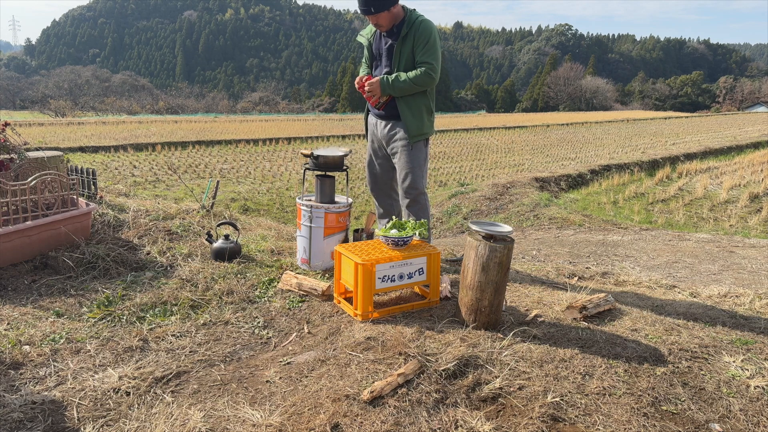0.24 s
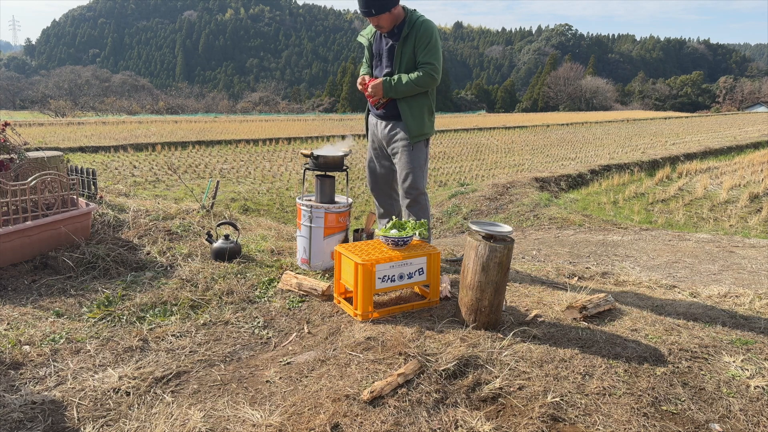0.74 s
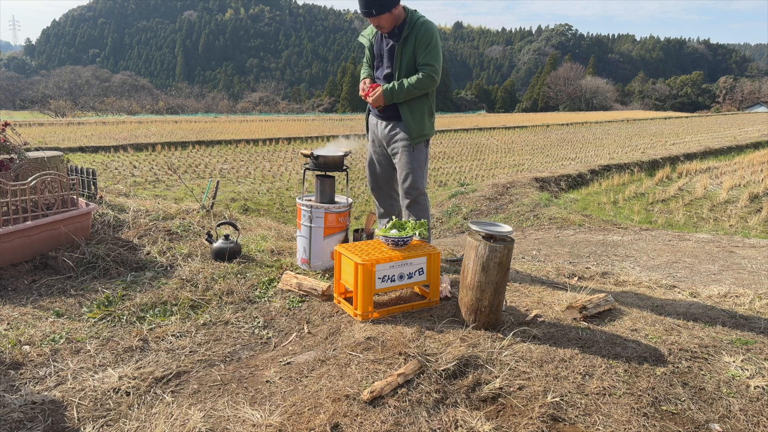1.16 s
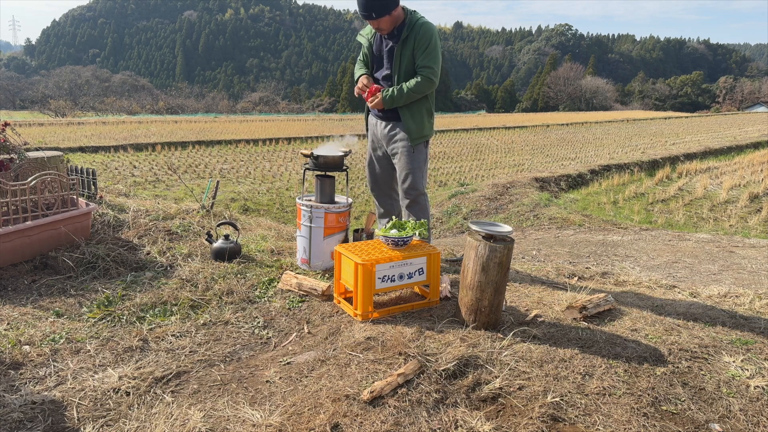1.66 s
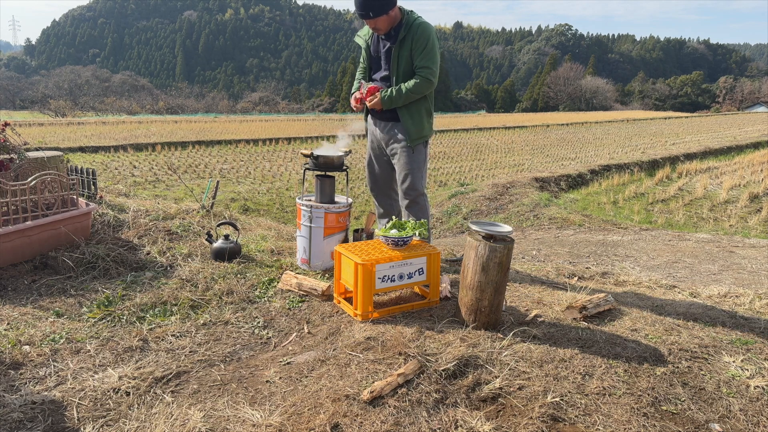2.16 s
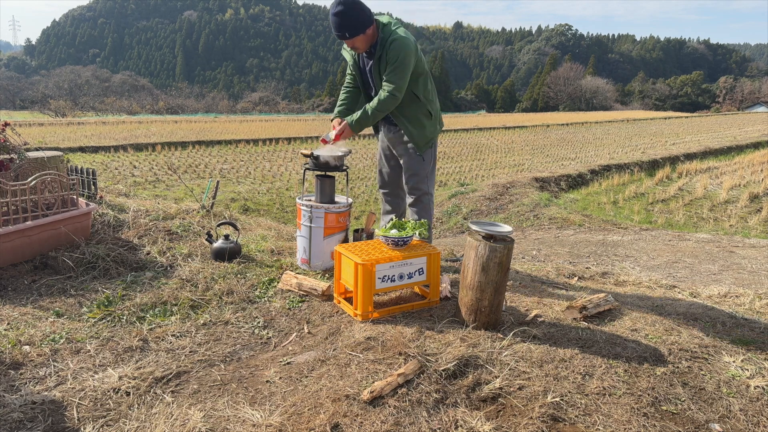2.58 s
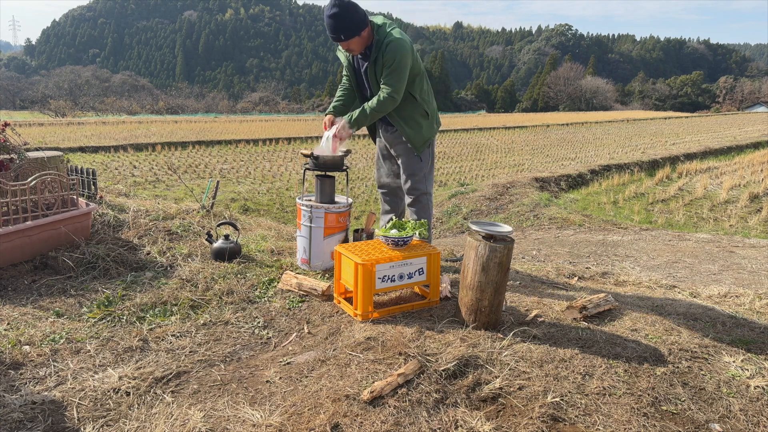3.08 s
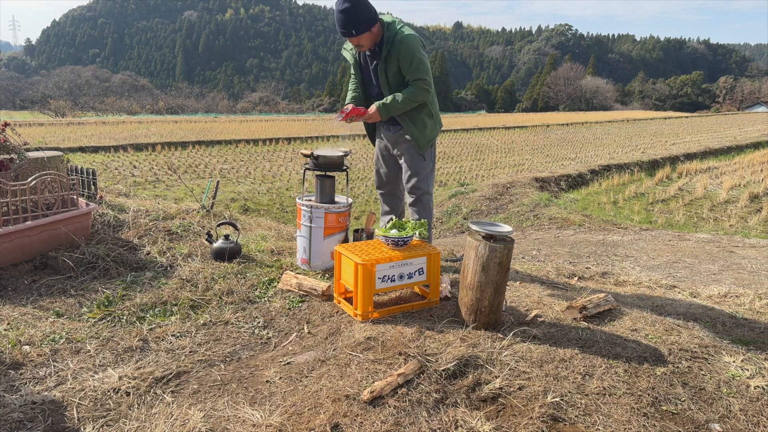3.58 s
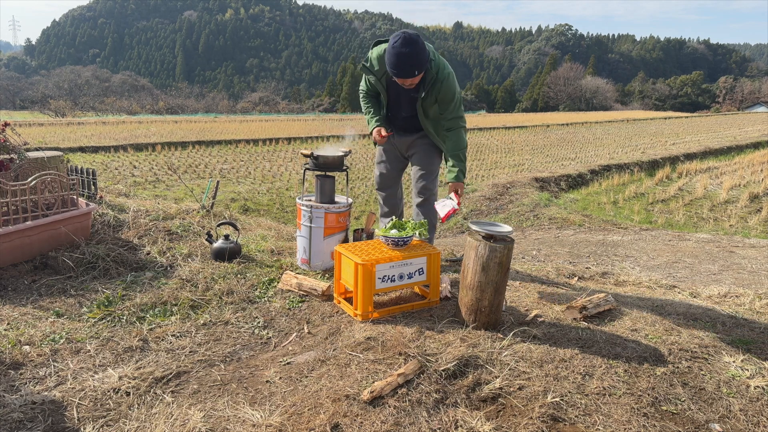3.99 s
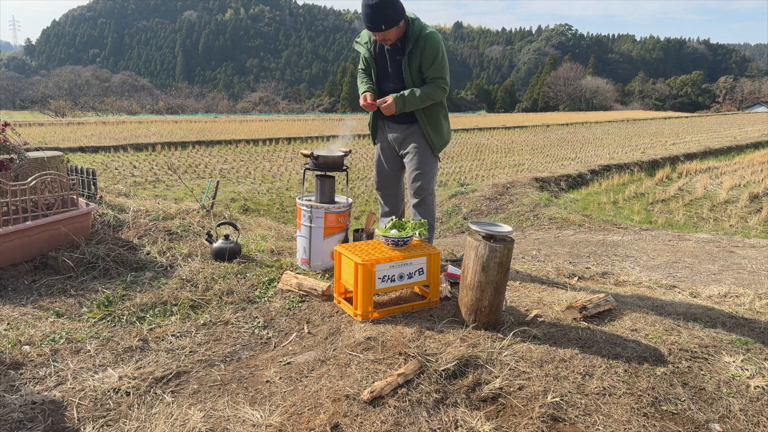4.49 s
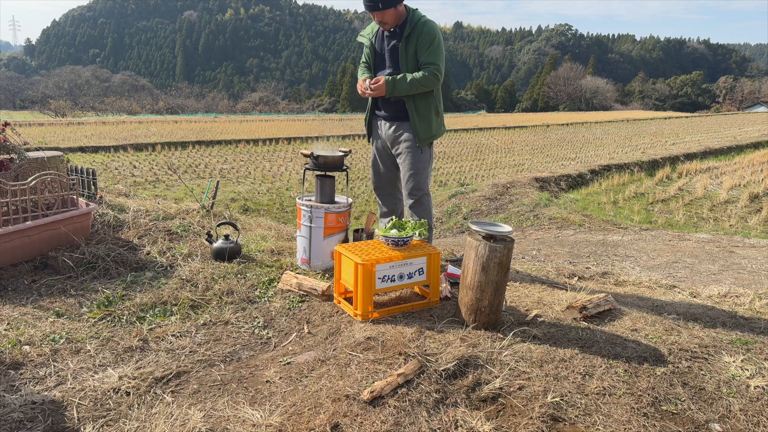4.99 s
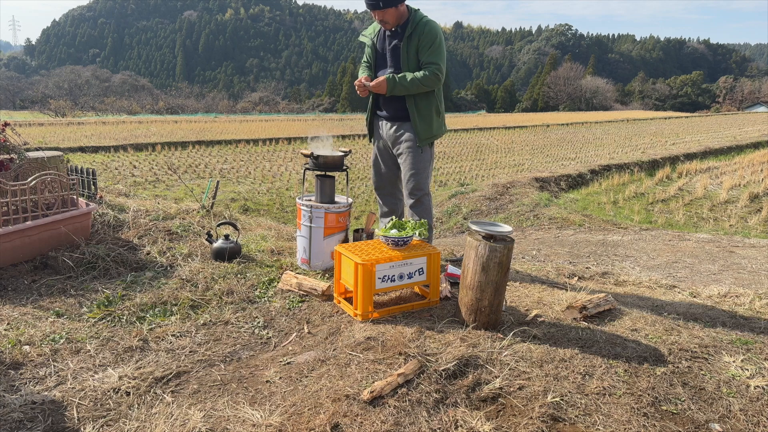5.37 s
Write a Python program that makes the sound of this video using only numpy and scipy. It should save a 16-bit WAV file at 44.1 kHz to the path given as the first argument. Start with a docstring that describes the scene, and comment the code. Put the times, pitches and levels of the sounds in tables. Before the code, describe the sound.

A stiff plastic food packet crackles loudly close up, is torn open and emptied, then folded with lighter crinkles, over a faint outdoor murmur.

```python
"""A plastic noodle packet, close to the microphone in a field, is torn open, emptied over a pot and folded up.
Every crease that buckles gives a bright tick of the film and a duller knock of the hollow pouch.
Big snaps stand out of a dense crinkle made of countless small buckles; the parting film squeals, a gliding
resonance driven by tiny jerks, and the noodle block thuds in the pouch. Under it a pot simmers in soft low blips,
the stove and open air murmur as coloured noise, and a breeze brushes the microphone as noise of the lowest bass."""
import sys
import numpy as np
from scipy import signal
from scipy.fft import rfft, irfft, next_fast_len
from scipy.io import wavfile
from scipy.ndimage import uniform_filter1d

SR = 44100
rng = np.random.default_rng(int(sys.argv[2]) if len(sys.argv) > 2 else 0)


def materialize(psi):
    """Save the field psi as 16-bit PCM at rate SR to the path in sys.argv[1].

    A 1-D psi becomes a single channel; in a 2-D psi each row is a channel.
    """
    bounded = np.clip(np.atleast_2d(psi).T, -1, 1)
    quanta = np.round(bounded * 32767).astype(np.int16)
    wavfile.write(sys.argv[1], SR, quanta)


N = 248724  # samples, 5.64 s

# The packet rings higher when taut and lower when slack: t/s, film f/Hz, pouch f/Hz
TAUTNESS_CURVE = [(0, 8800, 1480), (.5, 9030, 1480), (.8, 8400, 1490), (1.2, 9700, 1370), (1.8, 8350, 1260),
                  (2.1, 7200, 1490), (2.45, 8400, 1034), (2.95, 8200, 1110), (3.35, 7550, 620),
                  (3.6, 7630, 1150), (3.9, 7600, 600), (4.4, 8000, 1280), (4.9, 9760, 1570),
                  (5.6, 8900, 1170)]


def packet():
    """Snaps and crinkle, radiated by the film and by the pouch, each with its own colour and its own echo."""
    # how the film radiates: f/Hz, level/dB
    film_colour = [(300, -2.5), (1800, 9.5), (2800, -0.5), (4000, -2.5), (5500, -2), (7000, -2), (8500, 0),
                   (10300, 2), (11500, -0.5), (13000, -33.5)]
    # how the hollow pouch radiates: f/Hz, level/dB
    pouch_colour = [(40, 2.5), (130, -7), (220, -1), (320, -1), (500, -1.5), (800, -2), (1200, -1),
                    (1650, -1.5), (2150, -5), (2800, -1), (3700, -1), (5500, 5.5), (12000, -32)]
    snap_film, snap_pouch = snaps()
    fine_film, fine_pouch = crinkle(per_s=430, size_db=1.5, own_db=3.0, even_s=0.017, count=4500)
    film = coloured(snap_film + fine_film, film_colour)
    pouch = coloured(snap_pouch + fine_pouch, pouch_colour)
    film = outdoors(film, ground_db=-25.5, far_db=-30, far_t60=0.065)
    pouch = outdoors(pouch, ground_db=-37, far_db=-14, far_t60=0.039)
    return film + pouch


def snaps():
    """Big buckles: the film ticks, the pouch knocks and rings longer, with a crack that grows with the knock."""
    # snaps that stand out of the crinkle, levels ahead of the packet's colour:
    # t/s, film level/dB over 1 ms, pouch level/dB over 1 ms, pouch f/Hz, share of the energy in the noise burst/0-1
    snap_table = [(.0125, -24, -52, 1480, 0.26), (.0608, -33, -31.5, 2370, .07),
                  (.1497, -29.5, -29.5, 1520, 0.7), (.161, -34, -28.5, 2080, 0),
                  (.1712, -21, -31.5, 1220, 0), (.21, -30.5, -43, 2150, 0), (.2948, -32, -32.5, 1470, .4),
                  (.3088, -21, -36, 1380, 0.7), (.3486, -15, -25, 1510, 0), (.371, -23, -44, 1590, 0),
                  (.3884, -40, -24, 1040, 0.05), (.4435, -14, -25, 1860, 0.44), (.4578, -20, -45, 2260, 1),
                  (.529, -22.5, -28.5, 1350, 0.6), (.5362, -38, -22, 1500, 0.4),
                  (.5466, -19.5, -20, 1060, 0.73), (.5626, -16, -25.5, 1280, .4),
                  (.5995, -16.5, -31, 1920, 0.5), (.6263, -29, -31.5, 1600, 0.4),
                  (.637, -19.5, -25, 1520, 0.46), (.6963, -29, -31, 1590, 0),
                  (.7726, -29, -28.5, 1950, 0.6), (.8149, -7.5, -13.5, 1640, 0.08),
                  (.833, -19.5, -17, 1240, 0.4), (.8412, -20, -23.5, 1530, 0.22),
                  (.8474, -24, -29, 2350, 1), (.951, -32, -29, 1300, 0.7), (.9922, -28.5, -39, 1920, 0.2),
                  (1.0213, -28, -52, 1500, 0.4), (1.053, -30, -32, 1020, 0.1), (1.145, -36, -29, 1290, 0.2),
                  (1.1675, -21, -26.5, 1490, 0), (1.2052, -30, -23, 1950, 0.08),
                  (1.2172, -8, -16, 1570, 0.3), (1.2229, -19, -23, 1310, 1),
                  (1.3097, -17.5, -25.5, 2040, 0.4), (1.4484, -26.5, -19.5, 2100, 0.3),
                  (1.4927, -26, -28.5, 2160, 0.2), (1.753, -23, -33, 1490, 0.7),
                  (1.8187, -25.5, -26.5, 950, .4), (1.8411, -20.5, -23, 1420, 0.72),
                  (1.9669, -28, -26.5, 1590, 0), (2.0372, -23.5, -51, 1900, 0.5),
                  (2.074, -26.5, -33, 1930, 0.7), (2.2437, -35, -57, 1550, 0),
                  (2.3688, -37, -51, 1280, 0.3), (2.4484, -30, -31.5, 1080, 0.5),
                  (2.5553, -27.5, -55, 1160, 0.7), (2.6787, -28.5, -45, 1370, 0.8),
                  (2.777, -29, -50, 1310, 0.1), (2.7903, -25, -52, 1460, 1), (2.8876, -25, -55, 1410, 0.1),
                  (2.8971, -28, -50, 1025, 0.3), (2.9222, -35, -34.5, 1430, 0.1),
                  (2.9399, -28, -34, 1230, 0.7), (3.0007, -28.5, -55, 1870, .6),
                  (3.1432, -37, -47, 1030, .2), (3.2542, -38.5, -45, 1090, 1), (3.272, -39, -51, 990, 0.5),
                  (3.3327, -40, -40, 1010, 0.7), (3.3897, -40.5, -42.5, 1690, 0.06),
                  (3.4118, -38.5, -47, 1120, 0), (3.4937, -35, -40.5, 1670, .15),
                  (3.5239, -29, -35.5, 1650, 0.7), (3.5494, -37, -37.5, 1200, 0.1),
                  (3.6058, -30, -37.5, 1900, 0), (3.6414, -36, -35.5, 1080, .9),
                  (3.6673, -27.5, -33.5, 1260, 0.07), (3.7058, -33.5, -41.5, 1410, .4),
                  (3.839, -54, -46, 1210, 0), (3.872, -41.5, -54, 1400, 0), (3.9209, -33, -46, 840, .8),
                  (4.1294, -37, -61, 920, 0.14), (4.2514, -35, -54, 860, 1),
                  (4.2859, -24.5, -63, 1760, 0.3), (4.4106, -21, -46, 1590, 0.76),
                  (4.4498, -26.5, -43.5, 2220, .3), (4.4995, -29, -48, 1430, 0),
                  (4.5157, -28, -57, 1430, 0.2), (4.719, -34, -38.5, 1440, 1),
                  (4.8189, -26.5, -50, 1750, 0), (4.8464, -26, -34, 1650, .95),
                  (4.9016, -21, -35.5, 2090, 0.74), (4.987, -20, -35, 2320, 0.7),
                  (5.0447, -25, -47, 1480, 0.55), (5.0824, -26.5, -41, 1830, 0.94),
                  (5.1119, -21, -64, 1570, 0.08), (5.1787, -24, -59, 1800, 0.14),
                  (5.1861, -21, -39.5, 1400, 0.65), (5.33, -30, -46, 1560, 0.2),
                  (5.36, -26.5, -37.5, 2020, 0.4), (5.4426, -32, -45, 1740, 1),
                  (5.47, -33.5, -40, 1710, 0.16), (5.5158, -37.5, -49, 1400, 0.5),
                  (5.5603, -18.5, -41, 2400, 0.02)]
    s, film_db, pouch_db, pouch_hz, share = np.transpose(snap_table)
    # the snaps scatter about the film pitch; the spread is a frequency ratio in dB
    film_hz = in_time(TAUTNESS_CURVE)[0][(s * SR).astype(int)]
    film_hz = film_hz * from_db(rng.normal(0, 0.76, len(s)))
    one_ms = np.sqrt(SR / 1000)  # spreads the level over 1 ms
    tick = facets(film_hz, below=0.42, above=0.43, q=4.94, count=4, size=128)
    knock = facets(pouch_hz, below=1.305, above=0.74, q=4.25, count=4, size=800)
    crack = facets(pouch_hz * 2.2, below=1.0, above=1.0, q=2.12, count=2, size=256)  # an overtone of the pouch
    crack_db = 1.35 * pouch_db + 2.5  # the crack grows faster than the knock
    blurred = np.clip(share, 0, 1) ** 0.51  # the pouch has more of its energy in the burst
    film = buckles(s, one_ms * from_db(film_db), tick, 0.053 + share, rise_s=0.0042, fall_s=0.0043)
    pouch = buckles(s, one_ms * from_db(pouch_db), knock, blurred, rise_s=0.0024, fall_s=0.0032)
    pouch += buckles(s, one_ms * from_db(crack_db), crack, blurred, rise_s=0.00045, fall_s=0.0048)
    return film, pouch


def crinkle(per_s, size_db, own_db, even_s, count):
    """Countless small buckles of very unequal size; they come faster the harder the packet is worked."""
    film_db, pouch_db = handling()
    film_hz, pouch_hz = in_time(TAUTNESS_CURVE)
    at = rng.integers(0, N, count)
    rate = per_s * from_db(.3 * (film_db[at] + 41.0))  # per_s holds where the film is worked at -41 dB
    born = rng.random(count) < rate * N / SR / count
    size = size_db * np.minimum(rng.exponential(1, count), 4)
    own = own_db * rng.standard_normal((2, count))  # film and pouch differ
    film_size, pouch_size = born * from_db(size + own)
    share = rng.random(count) ** 0.38
    # every crease has a pitch of its own
    film_hz = film_hz[at] * from_db(rng.normal(0, 0.63, count))
    pouch_hz = pouch_hz[at] * from_db(rng.normal(0, 2.4, count))
    ticks = facets(film_hz, below=0.51, above=0.58, q=3.95, count=3, size=128)
    knocks = facets(pouch_hz, below=1.77, above=0.94, q=4.25, count=4, size=512)
    film = buckles(at / SR, film_size, ticks, share, rise_s=0.0013, fall_s=0.0048)
    pouch = buckles(at / SR, pouch_size, knocks, share, rise_s=0.0013, fall_s=0.0037)
    return from_db(film_db) * evened(film, even_s), from_db(pouch_db) * evened(pouch, even_s)


def handling():
    """How loudly the film and the pouch crinkle under the fingers, in dB ahead of the packet's colour."""
    # each squeeze or pull sets off a run of fine crinkle: first working at the seam and pulling it open,
    # from 2.2 s peeling it back and sliding the noodles out, from 3.8 s putting it down, then folding:
    # start t/s, length/s, swell from start to end/dB, film level/dB, pouch level/dB
    squeezes = [ (0, 0.1, -4.5, -39.5, -45), (0.138, 0.11, -6, -42.5, -51), (0.277, 0.16, -6, -35.5, -44),
                (0.441, 0.032, -1, -29, -35), (0.498, 0.11, 4.5, -35, -43.5), (0.605, 0.1, 5, -43.5, -43.5),
                (0.751, 0.039, 8, -39.5, -41), (0.813, 0.039, -3, -36, -39), (0.847, 0.049, 1, -43.5, -47),
                (0.933, 0.084, -7, -48, -46), (1.029, 0.095, 7, -50, -49.5),
                (1.118, 0.15, -1, -36.5, -41.5), (1.275, 0.079, 0.5, -35.5, -38.5),
                (1.367, 0.11, -0.5, -38.5, -41), (1.56, 0.078, 8, -45.5, -45),
                (1.634, 0.16, -5.5, -39, -41), (1.813, 0.037, 0, -36, -36.5),
                (1.901, 0.12, 4, -43.5, -48.5), (2.021, 0.12, 0.5, -42, -63), (2.227, 0.069, 6, -45, -43.5),
                (2.324, 0.11, 8, -52.5, -50.5), (2.428, 0.094, 9, -40, -44.5),
                (2.537, 0.16, -8.5, -44, -51.5), (2.712, .05, 8, -42.5, -49.5),
                (2.765, 0.19, -15, -39.5, -47.5), (2.973, 0.11, -8, -43.5, -50),
                (3.096, 0.069, -5.5, -59.5, -60), (3.25, 0.14, -3, -67.5, -67),
                (3.506, 0.087, 8.5, -55.5, -52.5), (3.65, 0.074, 3, -59, -59),
                (3.776, 0.11, -8.5, -53.5, -63), (4.012, .05, -4, -56, -67), (4.12, 0.17, -7, -54, -63),
                (4.275, 0.062, 6.5, -43.5, -58), (4.362, 0.3, -5.5, -48, -62.5),
                (4.575, 0.043, 10, -39, -53.5), (4.64, 0.061, 1, -45, -58), (4.686, 0.12, -0.5, -39.5, -53),
                (4.826, 0.19, -1, -39, -61), (5.036, 0.068, -7, -47.5, -61), (5.125, .11, 9.5, -48.5, -60),
                (5.276, 0.068, 2, -57.5, -60), (5.327, 0.037, 5.5, -49, -67), (5.44, 0.051, 0, -57.5, -69),
                (5.497, .075, 3, -60, -69), (5.627, .02, 3, -51.5, -58)]
    start, length, swell_db, film_db, pouch_db = np.transpose(squeezes)
    return strokes(start, length, swell_db, film_db), strokes(start, length, swell_db, pouch_db)


def strokes(start, length, swell_db, level_db):
    """Level in dB of hand movements: each takes hold quickly, swells or sags, is let go and leaves a faint tail."""
    grip_s, let_go_db_per_s = .009, 439.5
    relax_db, relax_db_per_s = -19, 33  # the creases go on relaxing, this much softer, and slowly come to rest
    t = np.arange(0, N, 32) / SR
    age = t - start[:, None]
    length = np.maximum(length, .005)[:, None]
    since = np.maximum(age - length, 0)
    held_db = level_db[:, None] + swell_db[:, None] * (np.clip(age / length, 0, 1) - .5)
    fade_db = np.maximum(-let_go_db_per_s * since, relax_db - relax_db_per_s * since)
    gain = np.clip(age / grip_s, 0, 1) * from_db(held_db + fade_db)
    loudest = np.max(gain ** 2, axis=0)
    return np.interp(np.arange(N) / SR, t, 10 * np.log10(loudest + 1e-12))


def buckles(s, gains, rings, share, rise_s, fall_s):
    """Each buckle is one sharp jump in a short two-sided burst of noise; both excite its ring."""
    lead = SR // 200  # 5 ms of burst ahead of the jump
    t = np.arange(-lead, 2 * lead) / SR
    envelope = np.exp(np.where(t < 0, t / rise_s, -t / fall_s)).astype(np.float32)
    drive = rng.standard_normal((len(s), len(t)), np.float32) * envelope
    share = np.clip(share, .02, .98)  # of the energy, in the burst
    drive *= (np.sqrt(share) / np.linalg.norm(drive, axis=1))[:, None]
    drive[:, lead] += np.sqrt(1 - share)  # the sharp jump
    sounds = signal.fftconvolve(drive, rings, axes=1)
    sounds = sounds * (gains / np.linalg.norm(sounds, axis=1))[:, None]
    at = (s * SR).astype(int)[:, None] + np.arange(sounds.shape[1])
    return np.bincount(np.maximum(at, 0).ravel(), sounds.ravel(), N + lead)[lead:N + lead]


def facets(hz, below, above, q, count, size):
    """One short ring per pitch, of energy 1: a few modes, from some octaves below it to some above, swell and die."""
    place = rng.random((len(hz), count))
    strength = rng.random((len(hz), count)) - .5
    octaves = (below + above) * (np.arange(count) + place) / count - below
    modes = hz[:, None] * 2 ** octaves
    # either sign, never silent, stronger towards the high modes
    strength = np.sign(strength) * (0.11 + np.abs(strength)) * modes / hz[:, None]
    rings = np.zeros((len(hz), size), np.float32)
    for k in range(count):
        step = (2 * np.pi * modes[:, k, None] / SR).astype(np.float32)
        turn = step * np.arange(size, dtype=np.float32)
        swell_and_die = turn * np.exp(-turn / np.float32(q))
        rings += strength[:, k, None].astype(np.float32) * np.sin(turn) * swell_and_die
    return rings / np.sqrt(np.sum(rings ** 2, axis=1, keepdims=True))


def outdoors(x, ground_db, far_db, far_t60):
    """A weak bounce off the ground and a faint scatter from the things standing around."""
    t = np.arange(SR // 3) / SR
    scatter = rng.standard_normal(len(t)) * from_db(-60 * t / far_t60) * (t > .008)
    response = from_db(far_db) * scatter / np.linalg.norm(scatter)
    response[int(.0078 * SR)] += from_db(ground_db)  # the bounce comes 7.8 ms late
    return x + signal.fftconvolve(x, response)[:N]


def tearing():
    """The stretched film squeals as it parts, and a strip runs off the top."""
    # the strip rises as it shortens: t/s, f/Hz, level/dB
    rip = [(2.02, 1250, -92), (2.06, 1520, -44), (2.12, 1660, -53), (2.145, 1960, -49), (2.175, 2560, -55),
           (2.19, 2700, -100)]
    # the squeal of the stretched film: t/s, f/Hz, level/dB
    squeal = [(.445, 10000, -80), (.456, 10200, -17.5), (.465, 10100, -27), (.475, 9800, -23),
              (.487, 8700, -35), (.493, 7400, -38), (.497, 8350, -31), (.502, 8400, -22.5),
              (.51, 8300, -75)]
    return tear(rip, width_hz=260, per_s=280) + tear(squeal, width_hz=580, per_s=4500)


def tear(curve, width_hz, per_s):
    """A tear advances in tiny jerks that excite a gliding resonance of the film."""
    hz, level_db = in_time(curve)
    turn = np.exp(2j * np.pi * np.cumsum(hz) / SR)
    jerks = (rng.random(N) < per_s / SR) * rng.standard_normal(N) + 1e-9
    # resonate at 0 Hz, then shift up to the gliding pitch
    ring = turn * signal.lfilter([1], [1, -np.exp(-np.pi * width_hz / SR)], jerks / turn)
    return from_db(level_db) * evened(ring.real, 0.0066)


def block(q, count):
    """The noodle block catches and slips against the pouch: many soft, low thuds."""
    # the dry block slides inside the pouch: start t/s, length/s, swell/dB, level/dB, f/Hz
    slides = [(.25, 0.5, -7, -62, 333), (1.193, 0.05, 0, -59, 380), (1.638, 0.13, -1, -50.5, 405),
              (1.97, 0.035, -4, -46.5, 296), (2.247, 0.28, 0, -56.5, 530), (2.77, 0.33, -8, -56.5, 570),
              (3.22, 0.38, -1, -63, 397)]
    start, length, swell_db, level_db, hz = np.transpose(slides)
    s = rng.random(count) * N / SR
    latest = np.maximum(np.searchsorted(start, s) - 1, 0)
    pitches = hz[latest] * from_db(rng.normal(0, 2.14, count))
    thuds = facets(pitches, below=1.0, above=0.99, q=q, count=2, size=1400)
    sizes = from_db(rng.normal(0, 7, count))
    bumps = buckles(s, sizes, thuds, np.full(count, .3), rise_s=0.00075, fall_s=0.0013)
    return from_db(strokes(start, length, swell_db, level_db)) * evened(bumps, 0.034)


def thumps():
    """A tug or a touch jolts the whole packet, which rings low for a few cycles."""
    # dull thumps: t/s, level/dB over 1 ms, f/Hz
    jolts = [(0.15, -32.5, 300), (.174, -36.5, 333), (0.369, -33, 360), (0.39, -41, 397), (0.445, -40, 243),
             (0.551, -32, 400), (.818, -31, 295), (1.219, -22, 362), (1.82, -31.5, 320),
             (1.978, -32.5, 294), (2.01, -42.5, 250), (3.053, -43, 376), (3.842, -43.5, 393),
             (3.916, -49, 348), (4.058, -54, 360), (4.134, -50, 370)]
    s, level_db, hz = np.transpose(jolts)
    one_ms = np.sqrt(SR / 1000)
    rings = facets(hz, below=0.16, above=0.62, q=3.36, count=3, size=1800)
    return buckles(s, one_ms * from_db(level_db), rings, np.full(len(s), .3), rise_s=.001, fall_s=0.0045)


def simmer(level_db, hz, q, count):
    """Bubbles in the simmering pot: soft low blips that merge into a steady murmur."""
    blips = facets(hz * from_db(rng.normal(0, 0.8, count)), below=0.12, above=0.016, q=q, count=1, size=2000)
    s = rng.random(count) * N / SR
    sizes = from_db(rng.normal(0, 3.2, count))
    bubbling = buckles(s, sizes, blips, np.full(count, .1), rise_s=0.00026, fall_s=0.0059)
    return from_db(level_db) * evened(bubbling, 0.087)


def stove_and_air(level_db):
    """The murmur of the fire and the open air: steady noise with a fixed colour."""
    # colour ahead of the overall level: f/Hz, relative level/dB per Hz
    air_colour = [(25, -10), (76, 1), (140, -0.5), (230, -3.5), (350, -31), (450, -15), (570, -13.5),
                  (780, -5), (1000, -19), (1640, -12.5), (2610, -24), (3700, -20.5), (6100, -21),
                  (11000, -16)]
    return from_db(level_db) * rms_one(coloured(rng.standard_normal(N), air_colour))


def breeze_on_microphone():
    """Moving air brushes the microphone: low noise that swells and fades."""
    # strength of the breeze: t/s, level/dB
    gusts = [(0, -64), (1.5, -69), (3.3, -68), (3.95, -60.5), (4.03, -48.5), (4.16, -63), (4.6, -64),
             (5.64, -74)]
    return from_db(in_time(gusts)[0]) * low_noise(hz=57)


def low_noise(hz):
    """Noise below a frequency, rms 1."""
    lowpass = signal.butter(2, hz, fs=SR, output="sos")
    return rms_one(signal.sosfilt(lowpass, rng.standard_normal(N + SR))[SR:])  # drop the filter's first second


def coloured(x, points):
    """Shape a sound with a smooth (Hz, dB) spectrum."""
    hz, db = np.transpose(points)
    size = next_fast_len(N + 4096)
    bins = np.maximum(np.fft.rfftfreq(size, 1 / SR), 1)
    gain = from_db(np.interp(np.log(bins), np.log(hz), db))
    return irfft(rfft(x, size) * gain, size)[:N]


def evened(x, seconds):
    """Hold the slow level near rms 1 and keep the grain."""
    size = max(int(seconds * SR), 64)
    power = uniform_filter1d(uniform_filter1d(x ** 2, size), size)
    return x / np.sqrt(np.abs(power) + 1e-9)


def in_time(rows):
    """The columns of a curve at every sample."""
    s, *columns = np.transpose(rows)
    return [np.interp(np.arange(N) / SR, s, c) for c in columns]


def rms_one(x):
    """Scale to rms 1."""
    return x / np.sqrt(np.mean(x ** 2) + 1e-20)


def from_db(db):
    """Decibels to gain."""
    return 10 ** (np.asarray(db) / 20)


def scene():
    """The packet over the simmering pot, the stove's murmur and the breeze."""
    noodles = block(q=1.9, count=600) + thumps()
    pot = simmer(level_db=-64.0, hz=343.5, q=7.9, count=900)
    background = pot + stove_and_air(level_db=-62.5) + breeze_on_microphone()
    return (packet() + tearing() + noodles + background)[None]


def record(dry):
    """The hardest peaks are rounded and the top is cut steeply."""
    top, cutoff_hz = .42, 11900  # top is the ceiling of the rounding
    rounded = top * np.tanh(dry / top)
    return signal.sosfilt(signal.cheby1(12, .3, cutoff_hz, fs=SR, output="sos"), rounded)


dry = scene()
out = record(dry)
materialize(out)
```